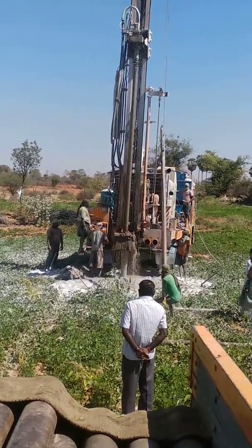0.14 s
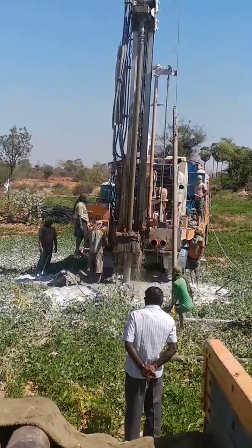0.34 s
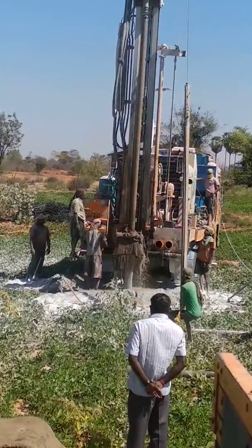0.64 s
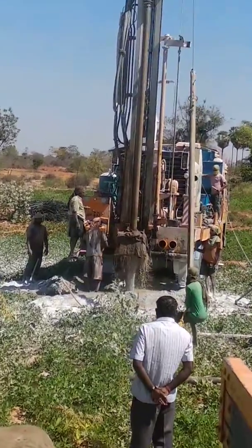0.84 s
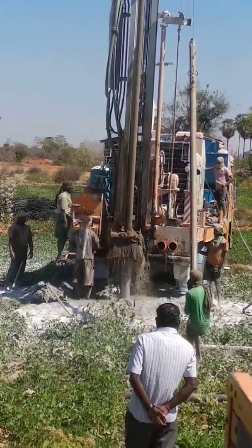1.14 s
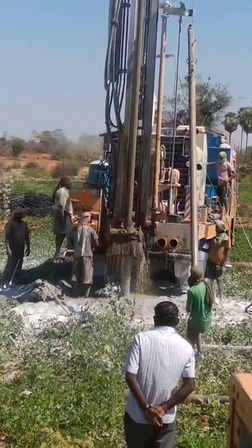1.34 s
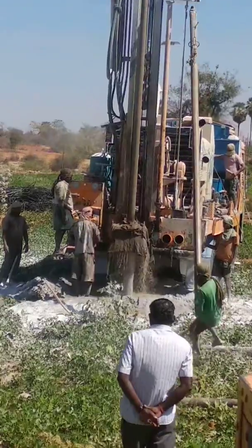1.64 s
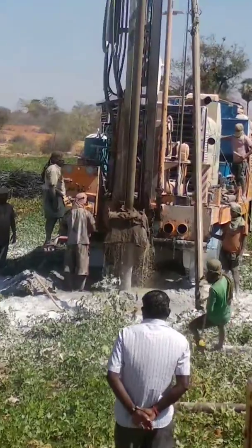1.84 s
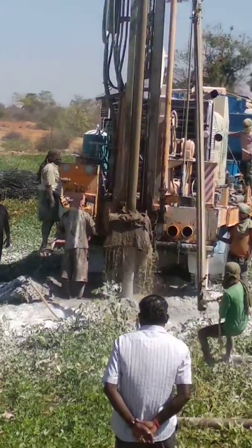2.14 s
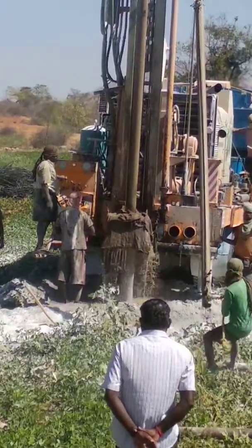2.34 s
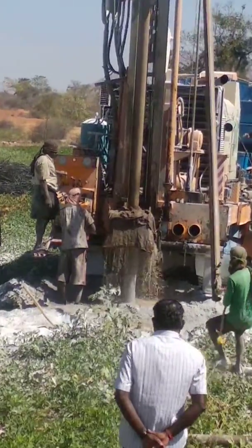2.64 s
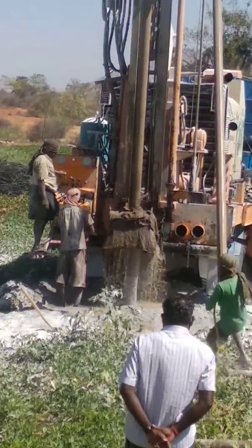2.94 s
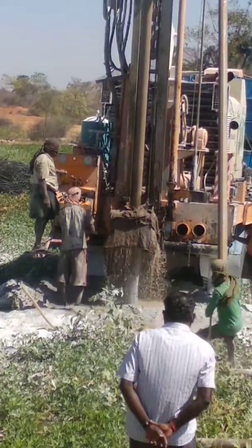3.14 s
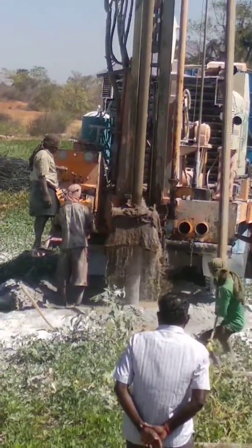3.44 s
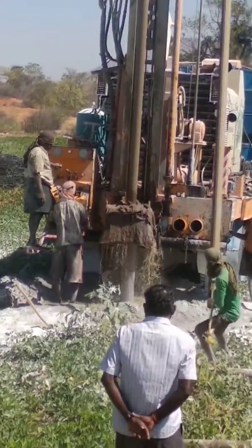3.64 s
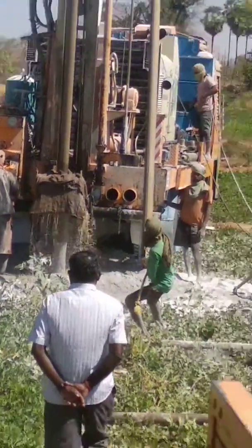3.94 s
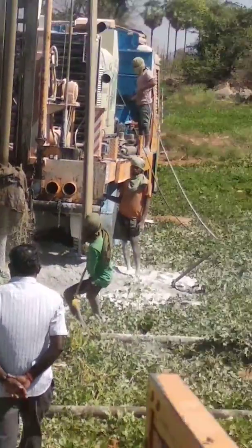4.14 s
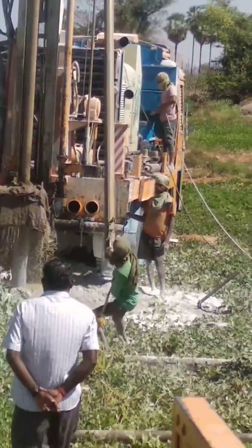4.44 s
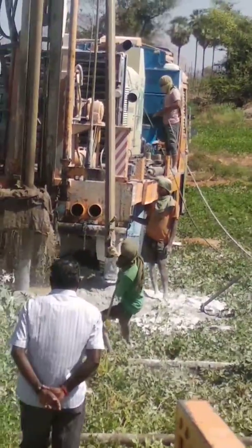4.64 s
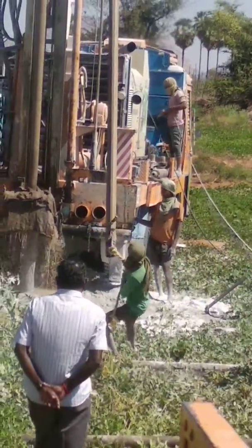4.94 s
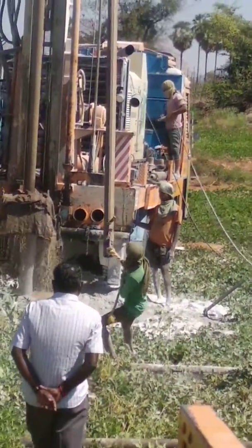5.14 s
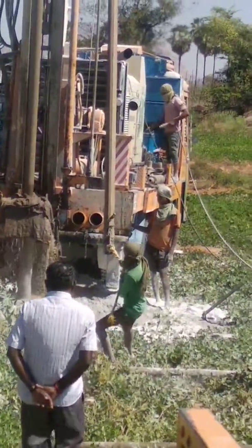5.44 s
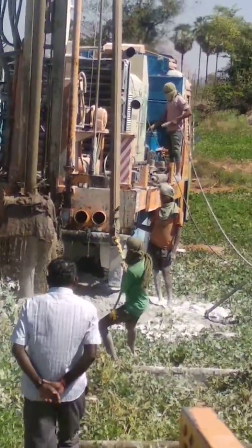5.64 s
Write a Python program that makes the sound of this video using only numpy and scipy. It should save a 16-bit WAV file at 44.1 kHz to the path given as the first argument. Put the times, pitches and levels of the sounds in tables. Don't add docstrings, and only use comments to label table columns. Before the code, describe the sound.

Low steady engine and compressor roar outdoors, with a harsh burst of compressed air early on, dull rod knocks and later sharp air spits.

```python
import sys
import numpy as np
from scipy import signal
from scipy.fft import rfft, irfft, next_fast_len
from scipy.io import wavfile
from scipy.ndimage import uniform_filter1d

SR = 44100
rng = np.random.default_rng(int(sys.argv[2]) if len(sys.argv) > 2 else 0)


def how_loud(loudness_db):
    steps = np.asarray(loudness_db, float) / 20
    return 10 ** steps


def transcribe(u):
    v = np.clip(np.atleast_2d(u).T, -1, 1)
    q = np.round(v * 32767).astype(np.int16)
    wavfile.write(sys.argv[1], SR, q)


N = 255266
T = np.arange(N) / SR
FRAME, HOP = 1024, 256
SLOW, QUARTER = 32, 4

# multiple of the engine cycle, level/dB
EXHAUST_ORDERS = [(1, -42), (2, -40), (3, -35), (4, -22), (5, -21), (6, 0), (7, -42), (8, -38), (9, -27.5),
                  (10, -19), (11, -17), (12, -15), (13, -28), (14, -35), (15, -20), (16, -22.5), (17, -25),
                  (18, -21.5), (19, -44), (20, -28.5), (21, -30.5), (22, -16.5), (23, -18.5), (24, -19),
                  (25, -41), (26, -25), (27, -24.5), (28, -21), (29, -23), (30, -38)]
# f/Hz, level/dB
GEAR_WHINES = [(559.9, -53.5), (694.4, -52.5), (1179, -64), (1513, -54.5), (1830, -51), (2229, -55.5),
               (2708, -53.5)]
# t/s, f/Hz, level/dB
ROTOR_SQUEAKS = [
    (.04, 2730, -77),
    (.065, 2705, -40),
    (.09, 2730, -67),
    (.15, 2750, -50),
    (.18, 2705, -42),
    (.22, 2710, -75),
]
# f/Hz, level/dB per Hz
ROAR_COLOUR = [(15, -30), (40, -16), (110, -3), (200, -6), (290, -4.5), (350, -4), (465, -10), (530, -3),
               (620, -11), (700, -4.5), (900, -12.5), (1150, -6), (1400, -12), (2000, -9), (2400, -13),
               (3500, -19.5), (6000, -60)]
# t/s, roar level/dB
COMPRESSOR_LOAD = [
    (0, -34),
    (1.2, -34),
    (1.6, -35.5),
    (3, -36.5),
    (4.3, -36.5),
    (4.7, -33),
    (5.3, -37.5),
    (5.55, -34),
    (5.79, -36),
]
# t/s, held/s, level/dB, low part level/dB, high part level/dB
GRIT_RATTLES = [
    (1.5, 0.058, 7, -10, -3.5),
    (2.28, 0.021, 6.5, -3, -14),
    (2.89, 0.019, -4, -14, 12.5),
    (2.98, .03, -7, -9, -2),
    (3.27, 0.026, -1.5, -6, 3),
    (3.65, 0.023, 3.5, -5, -0.5),
    (4.7, 0.025, -4, 3, -10),
    (5.15, .03, 1.5, -6, 4),
]
# t/s, peak level/dB, f/Hz
ROD_KNOCKS = [(0.082, -26.5, 326), (0.169, -27, 334), (0.246, -28, 360), (0.435, -27, 331),
              (0.76, -31, 345), (0.972, -34, 368), (1.166, -35, 330), (1.894, -34.5, 374),
              (2.011, -28.5, 350), (2.212, -26, 370), (2.29, -34, 308), (2.654, -27, 331),
              (3.142, -25, 355), (4.0, -32, 350), (4.192, -36, 348), (4.26, -35, 347), (4.328, -27, 345),
              (4.404, -33, 331), (5.264, -26.5, 338), (5.518, -25, 356), (5.72, -29, 344)]
# f/Hz, level/dB per Hz
LEAK_COLOUR = [(1470, -36), (2500, -7.5), (2640, -2.5), (3100, -7.5), (3500, -2.5), (3750, -5.5),
               (4240, -4.5), (6400, -4), (6960, -2), (8370, -6), (10550, -5.5), (11000, -8), (12400, -11),
               (13500, -16), (14300, -18), (15700, -28)]
# t/s, level/dB
LEAK_OPENING = [(0, -45), (.42, -45.5), (2.4, -37.5), (2.8, -40.5), (2.9, -37.5), (3.4, -39), (3.8, -40),
                (4.05, -38.5), (4.3, -40), (4.8, -39.5), (5.3, -37.5), (5.79, -39)]
# t/s, f/Hz
LEAK_EDGE = [(0, 12500), (.06, 12900), (.14, 15200), (.4, 15500), (2.4, 16200), (3.5, 16200), (3.62, 15400),
             (3.75, 16200), (3.92, 16200), (4.06, 13700), (4.13, 14200), (4.19, 16200), (4.7, 16000),
             (4.9, 15200), (5.1, 13900), (5.22, 12600), (5.3, 15200), (5.79, 15300)]
# t/s, left level/dB, right level/dB
LEAK_TOP = [(0, -12.5, -12.5), (.1, 7, 11), (.18, 4, 4), (.4, 10, 7), (2.4, 9, -1.5), (3.9, 9, -1),
            (4.02, -1, -6), (4.12, -1, -8), (4.2, 9, 2), (4.7, 5, 1), (5.2, -4, -4), (5.45, 1, 4),
            (5.79, 1, 2)]
# f/Hz, level/dB per Hz
SPURT_COLOUR = [(600, -70), (1300, -33), (1900, -19), (3200, -13.5), (4200, -7), (4800, -10), (5200, 0),
                (5900, -3), (7000, -7), (7600, -9.5), (7900, -21), (10000, -24.5), (13000, -46)]
# t/s fully open, held/s, level/dB, rumble level/dB, brightness level/dB
SPITS = [(3.37, 0.086, -31, -10, -10), (3.822, 0.0087, -41, -10, -6), (5.155, 0.027, -36.5, -4, 3),
         (5.185, 0.065, -28.5, -8, 3), (5.3, 0.042, -42, 4, 5), (5.385, .01, -31, -6, -1),
         (5.405, 0.016, -19, -2, 0), (5.435, 0.015, -26, 6.5, 3.5), (5.48, 0.019, -37, 0, 7),
         (5.55, 0.017, -43, 12, -11), (5.6, 0.11, -47, 25, -15), (5.765, .03, -41, 14, -12.5)]
# t/s, f/Hz, level/dB
SEEP_WHISTLE = [
    (.1, 6800, -64),
    (.135, 6850, -35),
    (.2, 6780, -35.5),
    (.26, 6400, -47),
    (.42, 6920, -42),
    (.45, 6770, -67),
]
# t/s, f/Hz, level/dB
SCREECH = [(.575, 15800, -35), (.61, 14900, -30), (.64, 13950, -29), (.69, 12900, -26), (.76, 12200, -25),
           (.82, 11980, -25), (.87, 11870, -23), (.93, 12300, -26), (1.0, 13030, -23), (1.08, 13900, -29),
           (1.16, 14760, -33), (1.22, 14560, -29), (1.29, 14310, -25), (1.39, 14150, -25),
           (1.5, 13930, -29), (1.65, 13850, -28), (1.77, 13880, -28), (1.84, 14090, -27), (1.9, 14480, -32),
           (1.96, 15150, -37), (2.03, 15900, -41)]
# f/Hz, level/dB per Hz
BLAST_COLOUR = [(900, -64), (1900, -27.5), (2650, -19), (3100, -18.5), (4400, -13.5), (4900, -12),
                (5100, -2), (6500, -2), (7300, -0.5), (9500, -3.5), (10600, -1.5), (11300, -4),
                (12400, -7.5), (13300, -3), (15700, -13.5)]
# t/s fully open, held/s, level/dB, rumble level/dB, brightness level/dB
VALVE_PUSHES = [(.42, 0.057, -30, -9, -11), (.52, .012, -22.5, -3.5, 2.5), (.6, .3, -17.5, -3, 3.5),
                (.75, 0.06, -23, 11.5, 2), (.94, 0.13, -16.5, -1, 0), (1.13, 0.091, -19, -2.5, -5),
                (1.25, 0.024, -21, -1.5, 0.5), (1.33, 0.033, -23.5, 3, 0), (1.4, 0.19, -16.5, -3.5, 0.5),
                (1.65, .2, -17.5, -2, -1), (1.9, 0.023, -26.5, -1, 4.5), (1.97, 0.066, -32, -1, 3.5),
                (2.07, 0.09, -30.5, 0.5, 8), (2.2, 0.049, -36, 2, 11.5), (2.3, 0.055, -39.5, 0, 9)]
# t/s, left level/dB, right level/dB
TREBLE_HOLLOW = [(.44, -3.5, -7), (.47, -14, -10), (.53, -6, -5), (.58, 0, -1.5), (1.9, -3, 1),
                 (1.97, -12, 0), (2.05, -23, 0.5), (2.17, -17, 4.5), (2.23, -22, -17), (2.36, -25, -18),
                 (2.41, -4, -8)]
# t/s, left level/dB, right level/dB
PLUME_SWING = [
    (.45, 1, -2),
    (.7, 0.5, 0),
    (1.1, -1, -1),
    (1.6, 0, 0),
    (1.899, -3.5, 1),
    (2.02, -3, 0.5),
    (2.15, -1.5, 1),
    (2.35, 1, -2.5),
]
# f/Hz, likeness 0-1, phase left lags/rad, left minus right level/dB
PORTS = [(60.4, 1, 0.11, 0.5), (323, 0.94, 0.12, 0.5), (700, 0.42, 0, -1), (1130, 0.7, -0.7, -0.5),
         (1380, 0.04, 3.5, 0.5), (1940, 0.21, -0.3, -1), (3310, 0.36, 0.08, 0), (3600, 0.93, 0.68, 0),
         (5020, 0.92, 1, -0.5), (5160, 0.33, -0.2, -2), (6110, 0.14, -4, 6), (6080, 0.68, 2, -0.5),
         (9000, 0.4, 1.17, -4.5), (10230, 0.3, 2, -0.5), (12200, 0.69, 1, 1.5), (15200, 0, 5.5, 2)]


def walk(rate, count, size=N, sr=SR):
    k = max(int(sr / rate), 1)
    held = np.repeat(rng.standard_normal((count, size // k + 1)), k, axis=1)[:, :size]
    return 1.4 * uniform_filter1d(uniform_filter1d(held, k), k)


def air(colour, shape, span, swell_db, flicker_db, flicker_hz, patches=40):
    start, end = int(span[0][0] * SR), min(int(span[-1][0] * SR) + HOP, N)
    noise = rng.standard_normal((2, N))[:, start:end]
    f, t, z = signal.stft(noise, SR, nperseg=FRAME, noverlap=FRAME - HOP)
    octave = np.log2(np.maximum(f, 10))
    hz, level_db = np.array(colour)[:, :2].T
    still = np.interp(octave, np.log2(hz), level_db)
    still -= 10 * np.log10(np.mean(how_loud(2 * still)))
    steps = dict(size=N // HOP + 8, sr=SR / HOP)
    patch = np.arange(len(f)) * patches // len(f)
    flicker = walk(flicker_hz, count=patches, **steps)[patch, :len(t)]
    flicker = uniform_filter1d(flicker, 5, axis=0)
    swell = walk(3.43, count=1, **steps)[:, :len(t)]
    db = still[:, None] + shape(t + start / SR, octave[:, None])
    db = db + swell_db * swell + flicker_db * flicker
    sound = signal.istft(z * how_loud(db), SR, nperseg=FRAME, noverlap=FRAME - HOP)[1]
    return np.pad(sound[:, :end - start], ((0, 0), (start, N - end)))


def puffs(rows, zones_hz, rise, sag, fall):
    def shape(t, octave):
        power = 0
        for s, held, db, rumble_db, bright_db in rows:
            level = db - rise * np.maximum(s - t, 0)
            level = level - sag * np.clip(t - s, 0, held) - fall * np.maximum(t - s - held, 0)
            colour = np.interp(octave, np.log2(zones_hz), [0, rumble_db, 0, bright_db])
            power = power + how_loud(2 * (level + colour))
        return 10 * np.log10(power + 1e-30)
    return shape


def wavering(phases, dbs, rate, size_db, slip):
    slow = walk(rate, count=2 * len(dbs), size=N // SLOW + 1, sr=SR / SLOW)

    def quick(rows):
        return np.repeat(rows, SLOW // QUARTER, axis=1)[:, :phases.shape[1]]

    size = quick(how_loud(dbs[:, None] + size_db * slow[::2]))
    sines = size * np.sin(phases + slip * quick(slow[1::2]))
    return np.sqrt(2) * signal.resample_poly(sines.sum(axis=0), QUARTER, 1)[:N]


def ports(x, pan_db=0.):
    size = next_fast_len(N)
    f = np.log(np.maximum(np.fft.rfftfreq(size, 1 / SR), 10))
    hz, *columns = np.transpose(PORTS)
    like, lag, balance_db = (np.interp(f, np.log(hz), c) for c in columns)
    like = np.clip(like, 0, 1)
    direct, scattered = rfft(x, size)
    right = like * np.exp(1j * lag) * direct + np.sqrt(1 - like ** 2) * scattered
    balance = how_loud(np.outer([.5, -.5], balance_db + pan_db))
    return irfft(np.array([direct, right]) * balance, size)[:, :N]


def shade(x, band_hz, curve):
    size = next_fast_len(N)
    f = np.fft.rfftfreq(size, 1 / SR)
    inside = np.clip(np.minimum(f - band_hz[0], band_hz[1] - f) / 150 + .5, 0, 1)
    s, *db = np.transpose(curve)
    gain = how_loud(np.array([np.interp(T, s, d) for d in db]))
    return x + (gain - 1) * irfft(rfft(x, size) * inside, size)[:, :N]


def surge_db(t):
    peak_s, width_s, duck_db = 0.75, 0.093, -6.5
    return duck_db * np.exp(-((t - peak_s) / width_s) ** 2)


def engine():
    firing_hz, droop_hz_per_s, firing_db = 91.18, 0.0751, -32
    settle_hz, settle_s = 1.67, 0.044
    hz = firing_hz + settle_hz * np.exp(-T / settle_s) - droop_hz_per_s * T
    turn = 2 * np.pi * np.cumsum(hz) / SR / 6
    order, order_db = np.transpose(EXHAUST_ORDERS)
    even = order % 6 == 0
    phases = np.outer(order, turn[::QUARTER])
    firing_phases = phases[even] + 0.605 * order[even, None]
    uneven_phases = phases[~even] + order[~even, None] ** 2
    firing = wavering(firing_phases, order_db[even], rate=11.0, size_db=0.6, slip=0.16)
    uneven = wavering(uneven_phases, order_db[~even] - .6, rate=9.0, size_db=3.0, slip=0.99)
    whine_hz, whine_db = np.transpose(GEAR_WHINES)
    whine_phases = 2 * np.pi * np.outer(whine_hz, T[::QUARTER])
    whine = wavering(whine_phases, whine_db - 1.0, rate=24.0, size_db=5.0, slip=0.98)
    out = (firing + uneven) * how_loud(firing_db + surge_db(T)) + whine
    return np.array([out, 0 * out]), turn


def roar(turn):
    usual_load_db, thin_per_db = -35, -0.18
    grit_from_hz = 497
    rattle = puffs(GRIT_RATTLES, (grit_from_hz, 900, 1490, 2400), rise=200, sag=6.5, fall=160)

    def shape(t, octave):
        db = np.interp(t, *np.transpose(COMPRESSOR_LOAD)) + surge_db(t)
        above_grit = np.clip(octave - np.log2(grit_from_hz), 0, 1)
        grit_db = 10 * np.log10(1 + how_loud(2 * rattle(t, octave)) * above_grit)
        tilt = thin_per_db * (usual_load_db - db)
        return db + grit_db + tilt * np.maximum(octave - np.log2(500), 0)

    noise = air(ROAR_COLOUR, shape, COMPRESSOR_LOAD, swell_db=-0.3, flicker_db=1.5, flicker_hz=8.0, patches=100)
    return noise * (1 + 0.05 * np.cos(6 * turn) + 0.055 * np.cos(turn))


def knocks():
    t60_s, lift_db, rise_s = 0.13, -1, 0.0047
    out, t = np.zeros(N + SR), T[:SR // 5]
    for s, db, hz in ROD_KNOCKS:
        ring = np.sin(2 * np.pi * hz * t) + 0.48 * np.sin(2 * np.pi * 1.133 * hz * t)
        envelope = how_loud(db + lift_db - 60 * t / t60_s) * np.minimum(t / rise_s, 1)
        out[int(s * SR):int(s * SR) + len(t)] += envelope * ring
    return np.array([out[:N], 0 * T])


def leak():
    fading_db, fading_tilt_db, fading_s = 5.5, 17.5, 0.034
    tilt_per_db, edge_db_per_khz = 0.61, 9

    def shape(t, octave):
        db = np.interp(t, *np.transpose(LEAK_OPENING))
        fading = np.exp(-t / fading_s)
        tilt = tilt_per_db * (db + 42.5) + fading_tilt_db * fading
        edge_hz = np.interp(t, *np.transpose(LEAK_EDGE))
        edge = edge_db_per_khz * np.maximum(2 ** octave - edge_hz, 0) / 1000
        return db - edge + fading_db * fading + tilt * np.maximum(octave - np.log2(6050), -1)

    return how_loud(4.0) * air(LEAK_COLOUR, shape, LEAK_OPENING, swell_db=0.46, flicker_db=1.6, flicker_hz=11.0)


def spurts():
    shape = puffs(SPITS, (895, 2600, 5650, 6800), rise=478, sag=12, fall=160)
    span = [[3.1], [6]]
    return how_loud(6.0) * air(SPURT_COLOUR, shape, span, swell_db=-1.0, flicker_db=2.16, flicker_hz=20.0)


def whistle(table, lift_db, spread_hz):
    s, hz, db = np.transpose(table)
    shake = walk(300.0, count=4)
    gain = np.sqrt(2) * how_loud(np.interp(T, s, db + lift_db, -150, -150))
    glide = uniform_filter1d(np.interp(T, s, hz), int(.045 * SR))
    phase = 2 * np.pi * np.cumsum(glide + spread_hz * shake[2:], axis=1) / SR
    return gain * how_loud(3.1 * shake[:2]) * np.sin(phase)


def blast():
    crack_s, crack_db_per_s, shut_s, shut_db_per_s = 0.4254, 2998, 2.385, 302
    zones_hz = 1000, 3500, 5540, 10600
    pushed = puffs(VALVE_PUSHES, zones_hz, rise=145, sag=3, fall=118)

    def shadow(t, octave):
        shadow_db, above_hz, width_hz, from_hz, full_hz = -8, 1300, 1100, 15000, 12500
        pitch = np.interp(t, *np.transpose(SCREECH)[:2])
        deep = np.clip((from_hz - pitch) / (from_hz - full_hz), 0, 1)
        return shadow_db * deep * np.exp(-((2 ** octave - pitch - above_hz) / width_hz) ** 2)

    def shape(t, octave):
        shut = shut_db_per_s * np.maximum(t - shut_s, 0)
        return pushed(t, octave) + shadow(t, octave) - shut

    crack = how_loud(9.0 - crack_db_per_s * np.clip(crack_s - T, 0, .05))
    span = [[.35], [2.8]]
    return crack * air(BLAST_COLOUR, shape, span, swell_db=0.03, flicker_db=1.26, flicker_hz=14.0)


def scene():
    drone, turn = engine()
    tones = whistle(SCREECH, lift_db=7.5, spread_hz=45)
    tones = tones + whistle(SEEP_WHISTLE, lift_db=-3.0, spread_hz=140)
    tones = tones + whistle(ROTOR_SQUEAKS, lift_db=4.0, spread_hz=12)
    rig = ports(drone + how_loud(-2.0) * roar(turn) + knocks() + tones)
    hollow_blast = shade(ports(blast()), (9320, 12050), TREBLE_HOLLOW)
    swinging_blast = shade(hollow_blast, (5530, 9400), PLUME_SWING)
    hiss = shade(ports(leak()), (14040, 16890), LEAK_TOP)
    return rig + hiss + swinging_blast + ports(spurts(), pan_db=-3.5)


def drop_masked(x):
    from_hz, busy_top_hz, thin_hz = 2300, 5000, 10600
    near_db, wide_db, cap_db = -3.0, -9.0, 5.5
    budget_db, thin_db, striped_db, knee_db = -21, 3.5, 3.5, -18
    turn = np.array([[1, 1], [1, -1]]) / np.sqrt(2)
    f, t, z = signal.stft(turn @ x, SR, nperseg=2 * FRAME, noverlap=FRAME + FRAME // 2)
    patch = uniform_filter1d(uniform_filter1d(np.abs(z) ** 2, size=2, axis=1), size=3, axis=2)
    frame = patch[:, f > from_hz].mean(axis=(0, 1))
    capped = np.minimum(patch, uniform_filter1d(patch, size=170, axis=1) * how_loud(cap_db))
    busy = frame / (frame + frame.max() * how_loud(2 * knee_db))
    near = uniform_filter1d(patch, size=40, axis=1) * how_loud(2 * near_db)
    wide = uniform_filter1d(capped, size=170, axis=1) * how_loud(2 * wide_db)
    thin = how_loud(2 * thin_db * (f > thin_hz))[:, None]
    striped = how_loud(striped_db * np.outer(f < busy_top_hz, busy))
    budget = np.outer(f < busy_top_hz, frame) * how_loud(2 * budget_db)
    kept = (patch > (near + wide) * thin * striped + budget) | (f < from_hz)[:, None]
    return turn @ signal.istft(z * kept, SR, nperseg=2 * FRAME, noverlap=FRAME + FRAME // 2)[1][:, :N]


def low_pass(x):
    return signal.sosfilt(signal.butter(12, 15800, fs=SR, output="sos"), x)


def record(dry):
    flattened = np.clip(dry, -1, 1)
    mix = drop_masked(flattened)
    return low_pass(mix)


dry = scene()
out = record(dry)
transcribe(out)
```